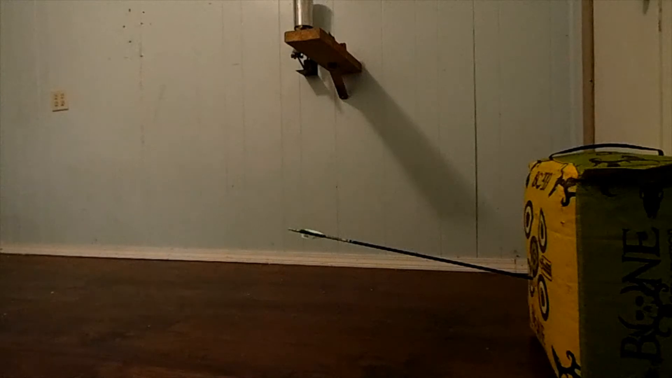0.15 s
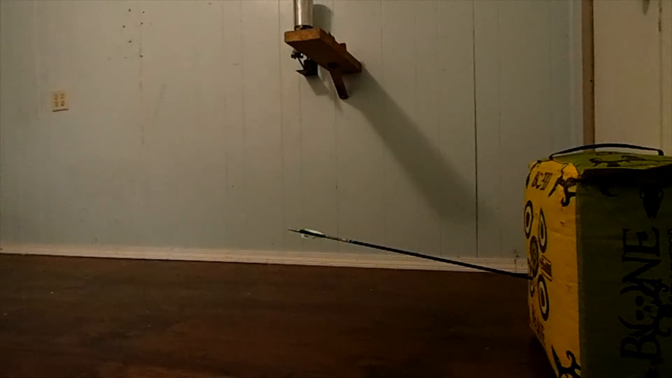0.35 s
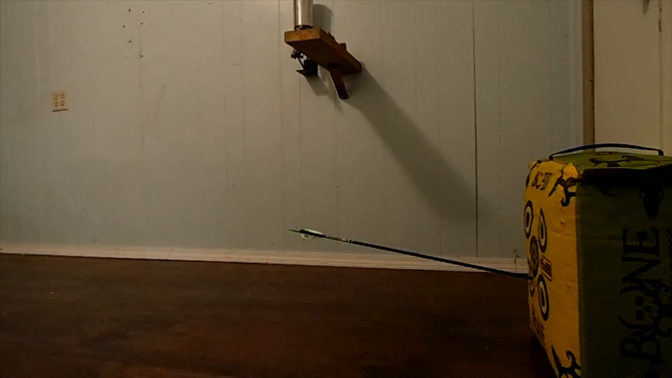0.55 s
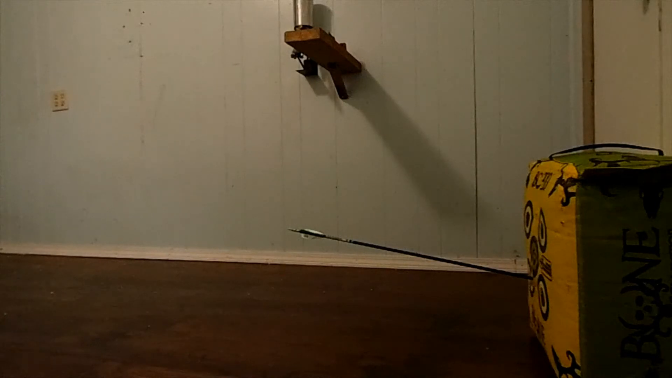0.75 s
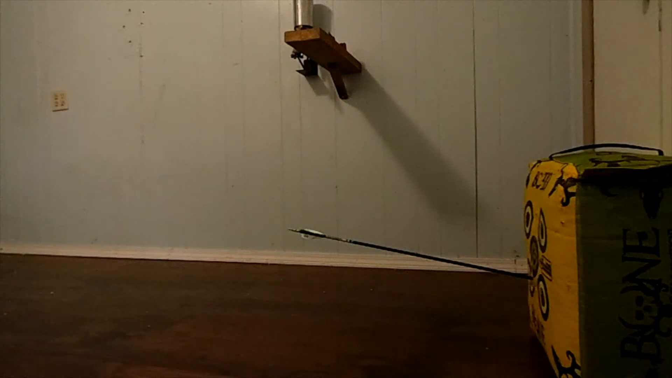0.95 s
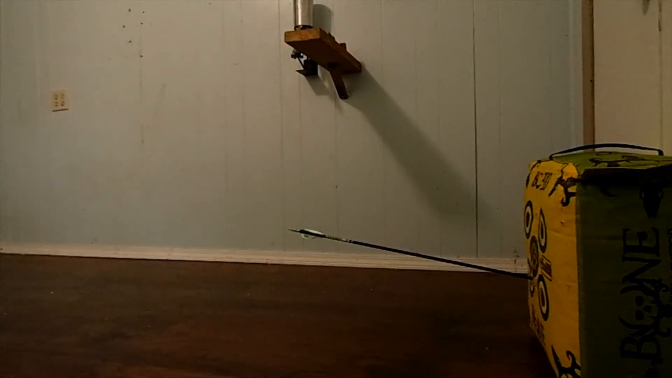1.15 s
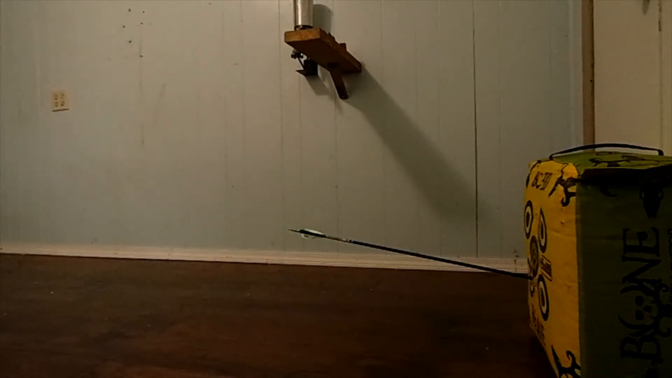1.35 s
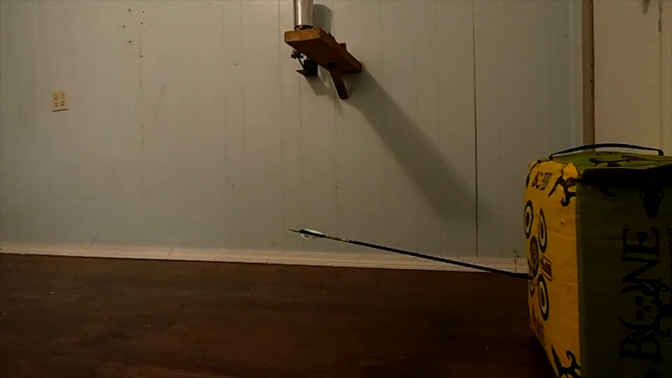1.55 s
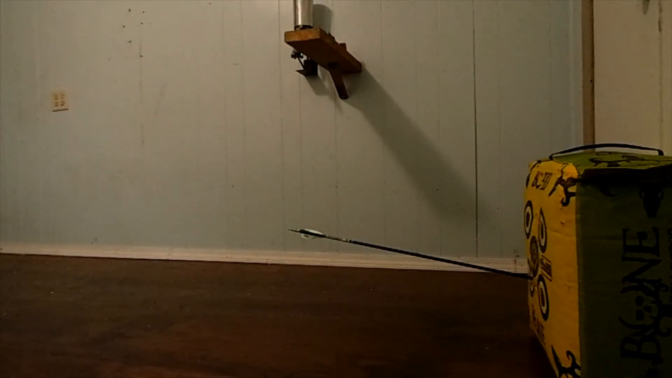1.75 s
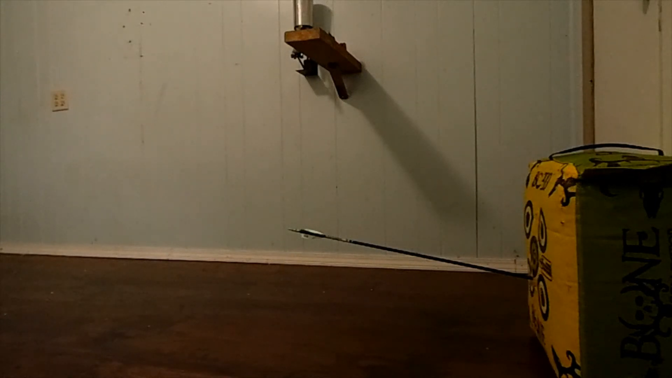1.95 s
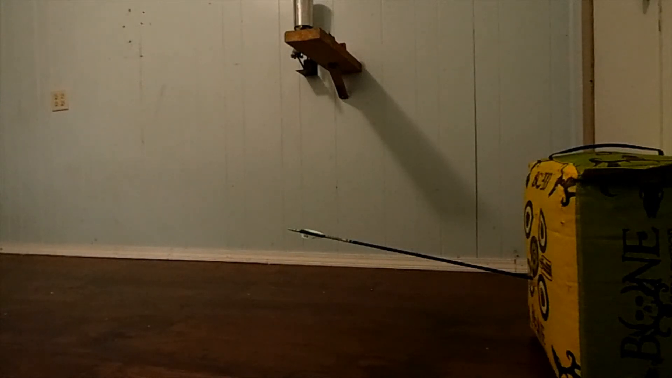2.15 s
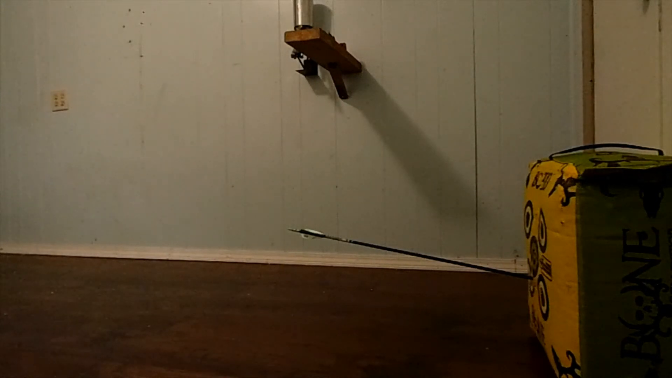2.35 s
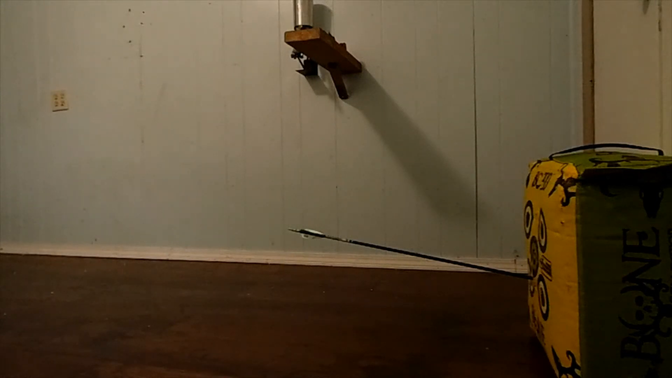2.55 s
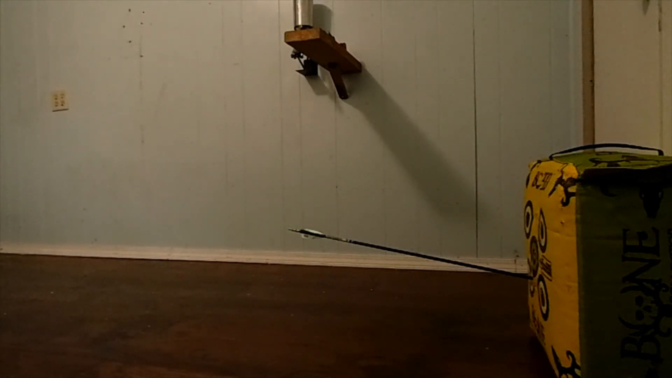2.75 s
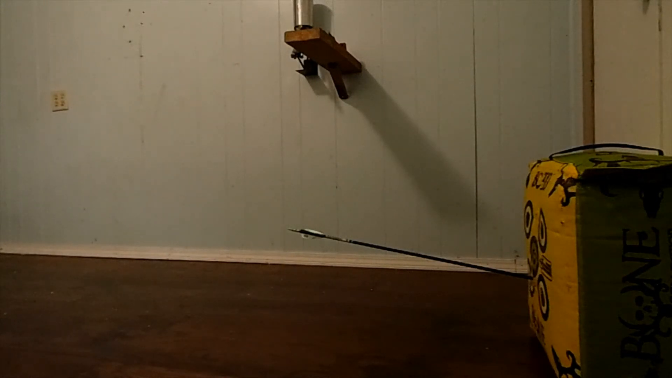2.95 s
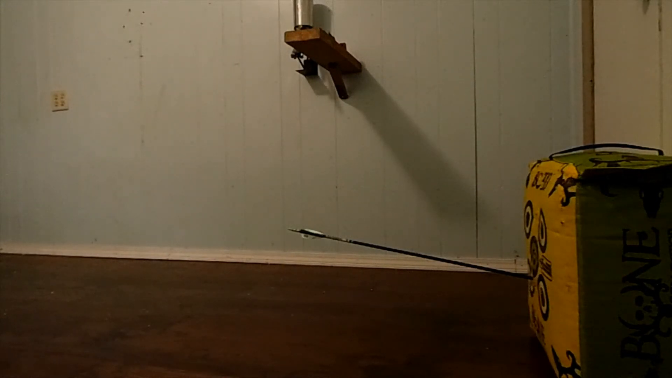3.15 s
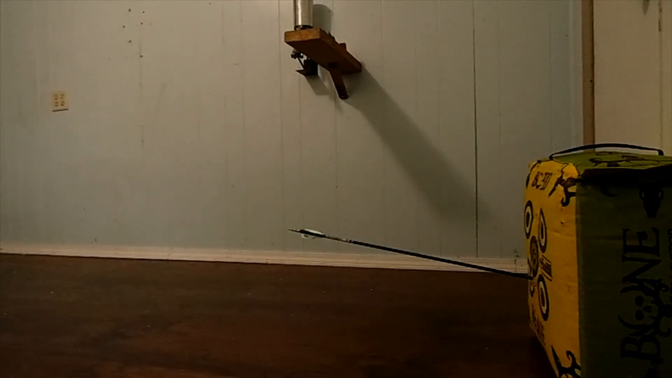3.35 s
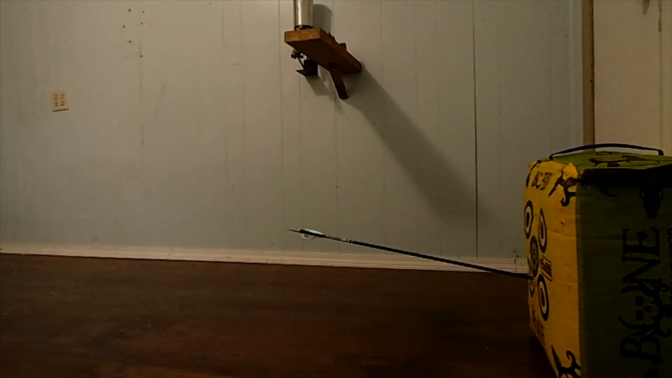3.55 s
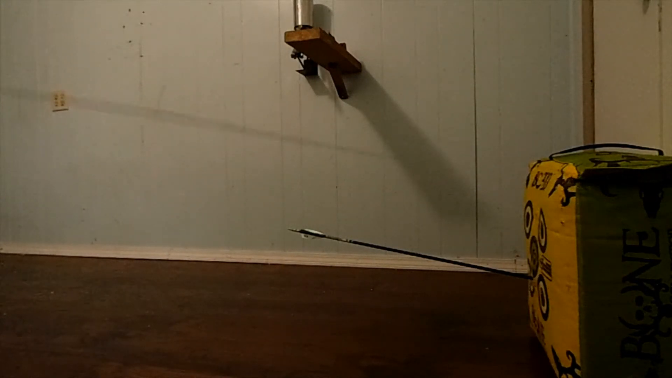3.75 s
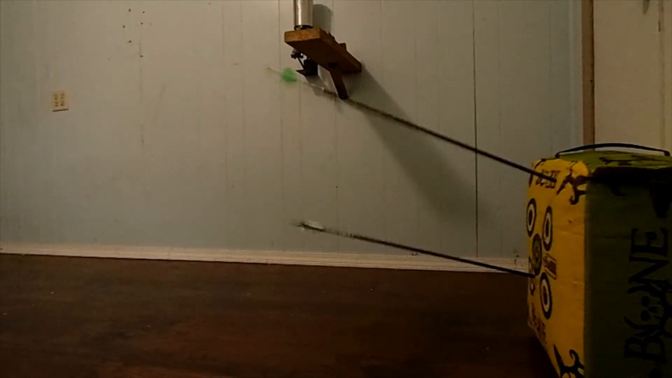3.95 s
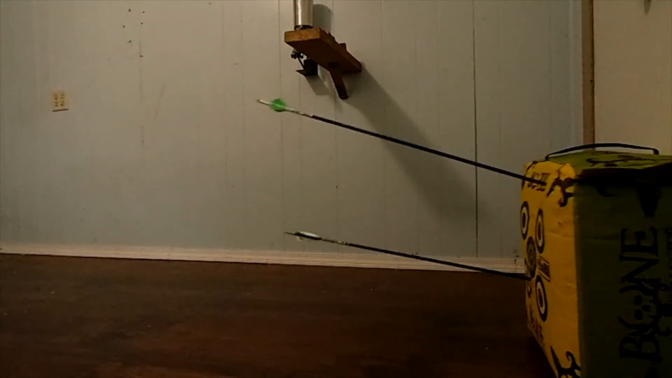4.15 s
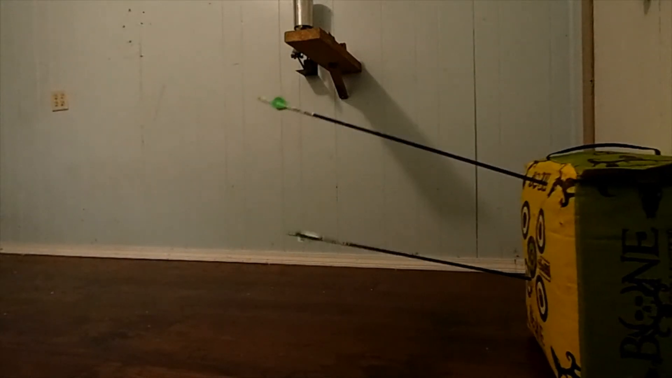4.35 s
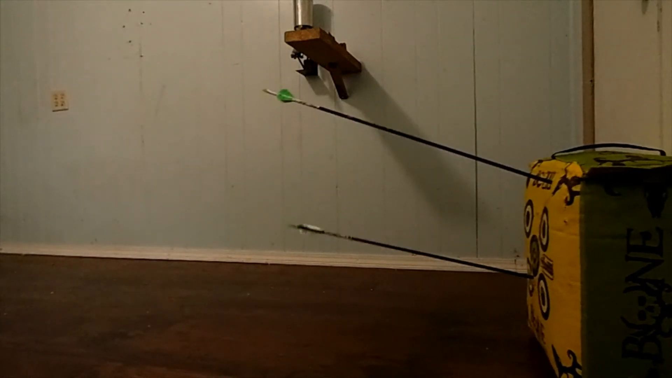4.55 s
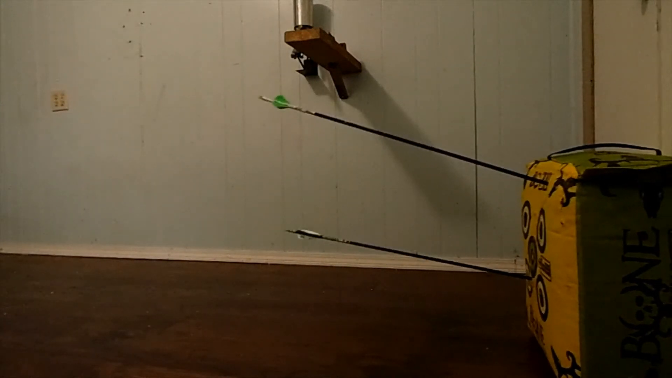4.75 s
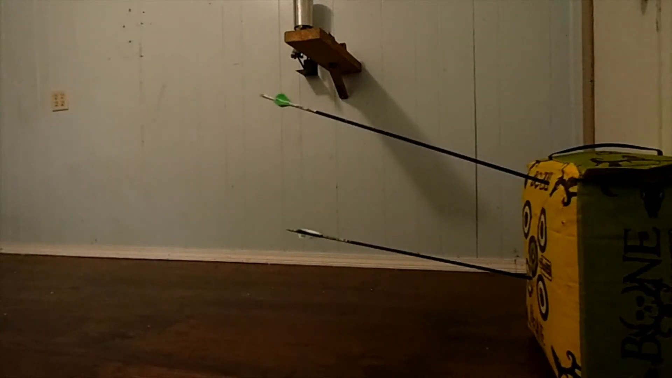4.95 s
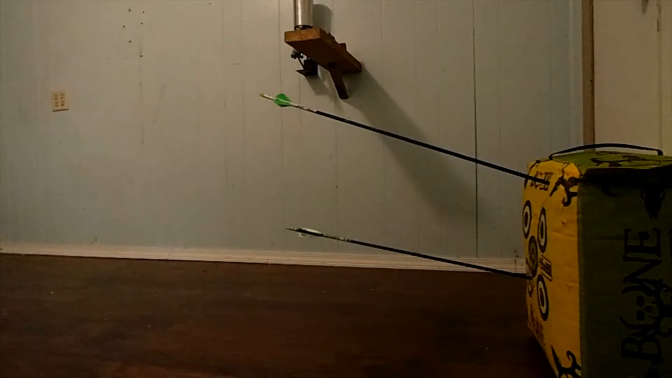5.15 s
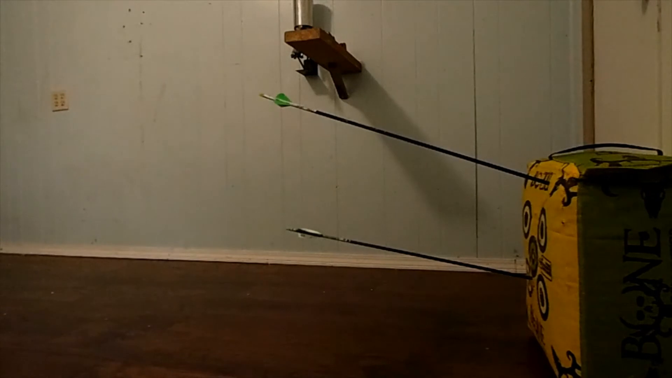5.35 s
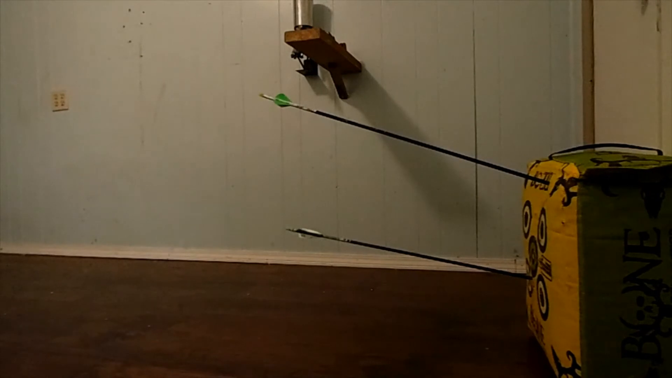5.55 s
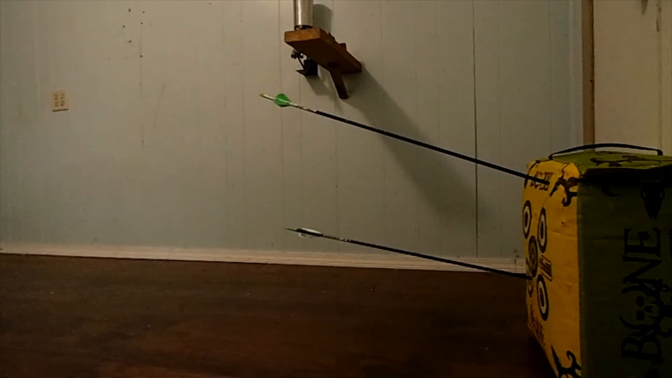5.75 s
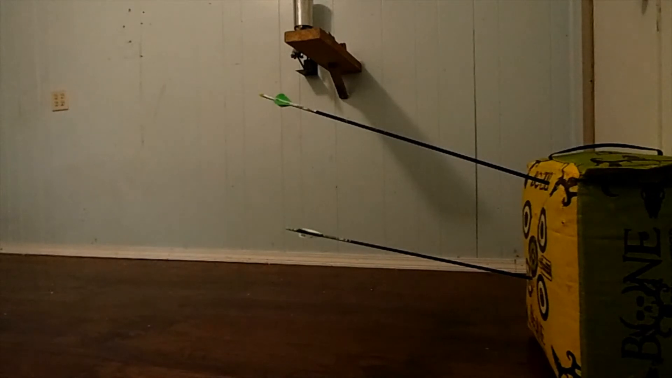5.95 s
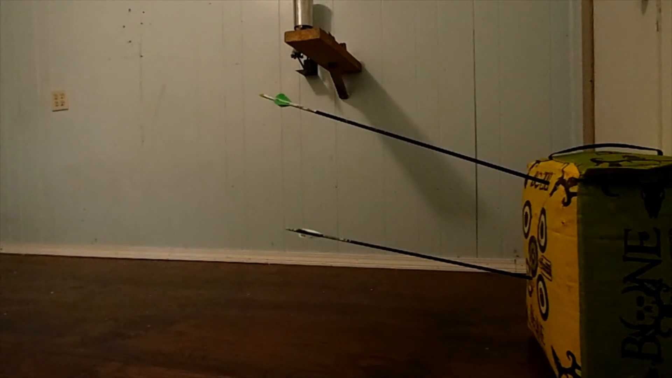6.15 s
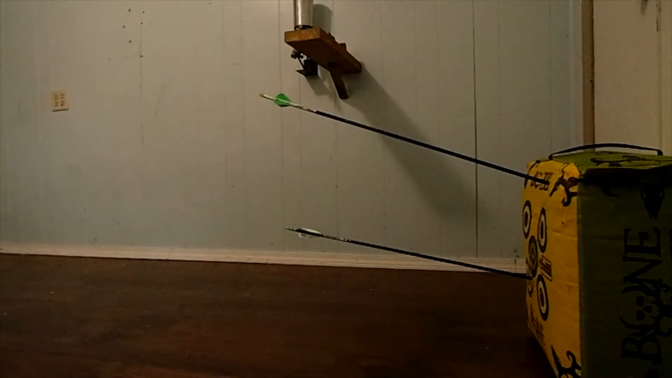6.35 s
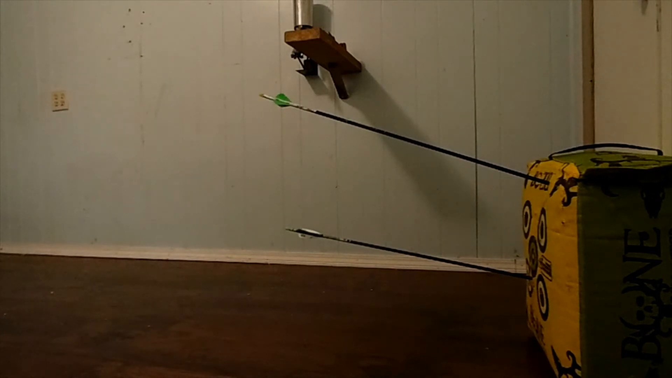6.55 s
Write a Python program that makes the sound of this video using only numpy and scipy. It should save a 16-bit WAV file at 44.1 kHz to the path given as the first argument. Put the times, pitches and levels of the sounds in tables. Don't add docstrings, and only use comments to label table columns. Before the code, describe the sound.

Quiet hissy room, a few woody clacks, a sharp bowstring snap, an overloaded boom of arrow into foam block, then rumble and small ticks.

```python
import sys
import numpy as np
from scipy import signal
from scipy.fft import rfft, irfft
from scipy.io import wavfile
from scipy.ndimage import uniform_filter1d

SR = 44100
rng = np.random.default_rng(int(sys.argv[2]) if len(sys.argv) > 2 else 0)


def field_ratio(decibels):
    return 10 ** (np.asarray(decibels, dtype=float) / 20)


def dump(signal):
    limited = np.clip(np.atleast_2d(signal).T, -1, 1)
    pcm = np.round(limited * 32767).astype(np.int16)
    wavfile.write(sys.argv[1], SR, pcm)


N = 291942


def evened(x):
    return x / np.sqrt(np.mean(x ** 2) + 1e-20)


def read(points, hz):
    f, value = np.transpose(points)
    return np.interp(np.log(hz + 1), np.log(f + 1), value)


def add(mix, start_s, sound):
    part = mix[round(start_s * SR):][:len(sound)]
    part += sound[:len(part)]


def coloured(x, spectrum):
    gain = field_ratio(read(spectrum, np.fft.rfftfreq(len(x), 1 / SR)))
    return irfft(rfft(x) * gain, len(x))


def noise(length, spectrum):
    return evened(coloured(rng.standard_normal(length), spectrum))


def ring(hz, db, t60, rise=0.00009):
    t = np.arange(round(SR * (abs(t60) + 0.01))) / SR
    return field_ratio(db - 60 * t / t60) * np.sin(2 * np.pi * hz * t) * (1 - np.exp(-t / rise))


def burst(db, t60, spectrum, rise=0.0006):
    t = np.arange(SR // 4) / SR
    shape = field_ratio(db - 60 * t / t60) * (1 - np.exp(-(t / rise) ** 2))
    return shape * noise(len(t), spectrum)


def click(db, spectrum):
    gain = np.log(field_ratio(read(spectrum, abs(np.fft.fftfreq(4096, 1 / SR)))))
    pulse = np.fft.ifft(np.exp(np.conj(signal.hilbert(gain)))).real[:2048]
    return field_ratio(db) * pulse / np.linalg.norm(pulse)


# (frequency [Hz], t60 [s])
ROOM_DECAY = [(60, 1.3), (150, 0.85), (350, 0.84), (700, 0.97), (1100, 1.178), (1600, 1.062), (3200, 0.87),
              (6000, 0.68), (12000, 0.69)]


def room(x, start, build):
    size = 2 * SR
    taps = np.zeros(size)
    at = np.arange(0, size - 16, 16)
    taps[at + rng.integers(0, 16, len(at))] = rng.choice([-1., 1.], len(at))
    hz, t, z = signal.stft(taps, SR, nperseg=512)
    decay = field_ratio(-60 * t / read(ROOM_DECAY, hz)[:, None])
    tail = signal.istft(z * decay, SR, nperseg=512)[1][:size]
    since_walls = np.maximum(np.arange(size) / SR - start, 0)
    tail = tail * (1 - np.exp(-since_walls / build))
    return signal.fftconvolve(x, tail / np.linalg.norm(tail))[:N]


# (frequency [Hz], level [dB per Hz])
HISS_TONE = [(100, 0), (2000, 0), (6000, -2), (10000, -5), (12000, -7), (13000, -10.5), (16000, -16)]


def recorder_hiss():
    hiss_db, duck_s, duck_db = -55.5, 4.1, -3.5
    after_hit = np.arange(N) / SR > duck_s
    return noise(N, HISS_TONE) * field_ratio(hiss_db + duck_db * after_hit)


# (frequency [Hz], level [dB per Hz])
AIR_TONE = [(15, 1), (30, 4), (100, -2), (185, 1), (300, -4), (500, -5), (1000, -8), (2500, -11),
            (6000, -20), (12000, -40)]


def still_air():
    return field_ratio(-56) * noise(N, AIR_TONE)


# (time [s], level [dB], t60 [s])
FLOOR_JOLTS = [
    (4.102, -20, 2.1),
    (4.72, -29, 1.03),
    (5.5, -59, 6.0),
]
# (frequency [Hz], level [dB], t60 [s])
REBOUND_MODES = [(62, -9, 0.14), (170, -30, .6)]


def boards():
    sway_hz, width_hz, skirt_hz, rise_s = 19, 37, 69.65, 0.031
    rebound_s = 4.645
    t = np.arange(N) / SR
    turn = np.exp(2j * np.pi * sway_hz * t)
    r, wide = np.exp(-np.pi * np.array([width_hz, skirt_hz]) / SR)
    slow = signal.lfilter([1], np.convolve([1, -r], [1, -wide]), rng.standard_normal(N) / turn)
    slow = slow / np.sqrt(uniform_filter1d(abs(slow) ** 2, size=3000))
    level = np.zeros(N)
    for s, db, t60 in FLOOR_JOLTS:
        age = np.maximum(t - s, 0)
        level += field_ratio(db - 60 * age / t60) * (1 - np.exp(-age / rise_s))
    out = np.sqrt(2) * (slow * turn).real * level
    for mode in REBOUND_MODES:
        add(out, rebound_s, ring(*mode, rise=0.0089))
    return out


# (time [s], peak level [dB], frequency [Hz])
SMALL_TICKS = [
    (4.565, -33, 5500),
    (4.569, -35, 6350),
    (4.689, -38.5, 5000),
    (5.04, -46, 4070),
    (5.059, -49, 5050),
    (5.165, -41, 5600),
    (5.183, -45, 4030),
    (5.82, -50, 2500),
    (5.924, -47.5, 1994),
]


def ticks():
    near, far = np.zeros((2, N))
    for s, db, hz in SMALL_TICKS:
        tone = [(hz / 4, -16), (hz / 2, -3), (hz, 0), (1.3 * hz, -4), (1.5 * hz, -24), (2.2 * hz, -60)]
        add(near, s, burst(db, 0.027, tone))
        add(far, s, click(db + 14.5, tone))
    return near + room(far, 0.002, 0.0049)


# (time [s], peak level [dB], rattle level [dB])
LIMB_SLIPS = [
    (0.732, -19, -4.5),
    (0.78, -21, -7),
    (0.823, -21, -6),
    (0.878, -21, -6),
    (0.945, -18.5, -7.5),
    (1.008, -19, -7),
    (2.043, -13.5, -1.5),
    (6.278, -14.5, -1.5),
]
# (frequency [Hz], level [dB], t60 [s], sign at the microphone)
LIMB_MODES = [(124, -10, 0.069, 0.96), (314, 1, 0.036, -1.23), (469, -2.5, 0.083, 0.78),
              (739, 0, 0.052, 0.86), (947, -2.5, 0.014, 1), (1382, -3.5, 0.022, 0.53),
              (2010, -22, 0.043, 0.79), (2500, -48, 0.046, -0.51)]
# (frequency [Hz], level [dB per Hz])
RATTLE_TONE = [(150, -16), (500, 1), (850, -3), (970, 3), (1150, 3), (1400, -3.5), (1800, -3), (2180, 0.5),
               (2600, -4), (3100, -6), (5000, -10.5), (6200, -24), (9000, -40), (14000, -60)]
# (delay [s], level [dB])
KNOCK_ECHOES = [(.003, -13.5), (0.0237, -33), (0.0279, -11.5), (0.037, -15), (0.042, -15.5)]


def limb():
    lag_s = 0.0018
    far_wall_s, far_wall_db = 0.033, -10.5
    wood = np.zeros(SR // 4)
    rattle = burst(-2.5, 0.071, RATTLE_TONE, rise=0.0039)
    for hz, db, t60, sign in LIMB_MODES:
        add(wood, 0, sign * ring(hz, db, t60))
    wood = signal.sosfilt(signal.butter(2, 90, "high", fs=SR, output="sos"), wood)
    near, far = np.zeros((2, N))
    for s, db, bright_db in LIMB_SLIPS:
        add(near, s + lag_s, field_ratio(db - 7.5) * (wood + field_ratio(bright_db) * rattle))
        add(far, s, click(db + bright_db + 8, RATTLE_TONE))
    wet = near + room(field_ratio(-10.0) * near + far, 0.015, 0.0053)
    add(wet, far_wall_s, field_ratio(far_wall_db) * far)
    for delay, db in KNOCK_ECHOES:
        add(wet, delay, field_ratio(db) * near)
    return wet


# (time [s], level [dB])
STRING_RUSH = [
    (3.818, -85.5),
    (3.824, -39),
    (3.84, -43.5),
    (3.853, -28),
    (3.857, -23),
    (3.9, -30.5),
    (3.97, -24.5),
    (4.05, -30),
]
# (time [s], level [dB], t60 [s])
STRING_SNAPS = [
    (3.857, -10.5, 0.033),
    (3.873, -10, 0.04),
    (3.881, -9.5, 0.042),
]
# (frequency [Hz], level [dB per Hz])
STRING_TONE = [(40, -7.5), (120, -4.5), (250, 0), (400, 1.5), (600, -1.5), (1100, -3.5), (1500, 1),
               (2200, -6), (3100, -1), (4500, -7), (7000, -12.5), (9000, -30), (11500, -36), (16000, -36)]
# (frequency [Hz], level [dB], t60 [s])
BOW_HUM = [(85, -18, .12), (250, -19, .45), (440.5, -26, .3)]


def string():
    s, db = np.transpose(STRING_RUSH)
    rush = field_ratio(np.interp(np.arange(N) / SR, s, db, left=-120, right=-120))
    near = noise(N, STRING_TONE) * rush
    far = np.zeros(N)
    for s, db, t60 in STRING_SNAPS:
        add(near, s, burst(db, t60, STRING_TONE))
        add(far, s + 0.001 * rng.random(), click(db + 22.0, STRING_TONE))
    add(near, 3.874, ring(3050, -17, 0.04, rise=0.003))
    for mode in BOW_HUM:
        add(near, STRING_SNAPS[0][0], ring(*mode, rise=0.015))
    return near + room(far + near, 0.00092, 0.0077)


# (frequency [Hz], level [dB per Hz])
FOAM_TONE = [(30, -34), (80, -15), (160, -17), (280, -0.5), (400, 2.5), (600, -1), (850, -7.5),
             (1100, -17.5), (1500, -15), (2000, -19), (2600, -22.5), (4500, -25), (7000, -43), (12000, -63)]
# (frequency [Hz], level [dB], t60 [s])
BLOCK_BOOM = [(81, 6, 0.3), (111.5, 4.5, 0.2)]


def arrow():
    hit_s, hit_db, crunch_t60 = 4.0515, 17.5, 0.044
    wag_hz, wag_depth_db, wag_spread_hz = 25.9, 1.4, 52
    near, far = np.zeros((2, N))
    add(near, hit_s, burst(hit_db, crunch_t60, FOAM_TONE, rise=0.0011))
    add(far, hit_s, click(hit_db + 27.5, FOAM_TONE))
    for mode in BLOCK_BOOM:
        add(near, hit_s, ring(*mode))
    wag = noise(N, [(wag_hz / 4, -12), (wag_hz, 0), (wag_hz + wag_spread_hz, -40), (SR, -120)])
    return near + room(far, 0.0044, 0.013) * field_ratio(wag_depth_db * wag)


def scene():
    return (still_air() + boards() + ticks() + limb() + string() + arrow())[None]


# (time [s], lowest frequency affected [Hz])
THIN_MOMENTS = [(0.045, 1920), (0.452, 1500), (0.492, 1500), (0.581, 900), (1.435, 100), (2.255, 3200),
                (2.37, 1500), (2.843, 400), (3.973, 1790), (4.673, 1236), (5.55, 352), (6.381, 3000),
                (6.509, 2000)]


def thin_out(x, keep_db=3.5, hole_db=-22):
    hz, t, z = signal.stft(x, SR, nperseg=256, noverlap=192)
    level = uniform_filter1d(abs(z), size=15, axis=1)
    weak = level < field_ratio(keep_db / 2) * uniform_filter1d(level, size=9, axis=0)
    depth = np.zeros(z.shape)
    for s, above_hz in THIN_MOMENTS:
        depth += np.exp(-((t - s) / 0.005) ** 4) * (hz[:, None] > above_hz)
    return signal.istft(z * field_ratio(hole_db * depth * weak), SR, nperseg=256, noverlap=192)[1][:N]


def top_cut(x):
    return signal.sosfilt(signal.butter(12, 16400, fs=SR, output="sos"), x)


# (frequency [Hz], level [dB])
BAND_EDGE = [(9000, 0), (11000, -2), (11700, -7), (12100, -11), (12700, 0), (15700, 2), (16000, -30),
             (22050, -45)]


def record(dry):
    ceiling, coupling_hz = 0.92, 9
    clipped = np.clip(dry[0], -ceiling, ceiling)
    sagged = signal.lfilter(*signal.butter(1, coupling_hz, "high", fs=SR), clipped)
    edged = coloured(sagged + recorder_hiss(), BAND_EDGE)
    mix = thin_out(edged)[None]
    return top_cut(mix)


dry = scene()
out = record(dry)
dump(out)
```